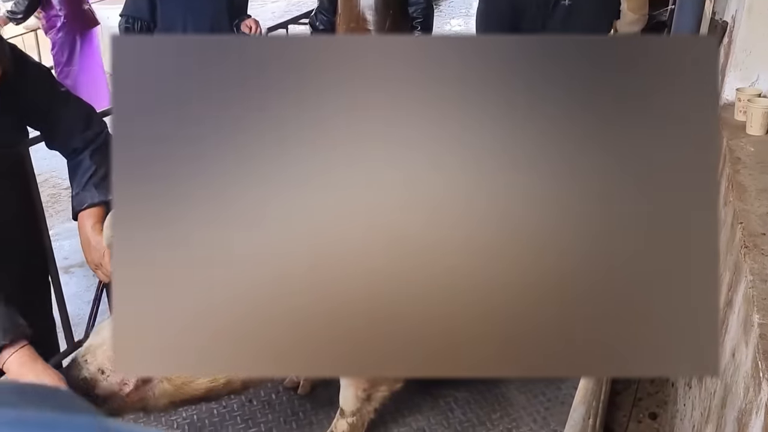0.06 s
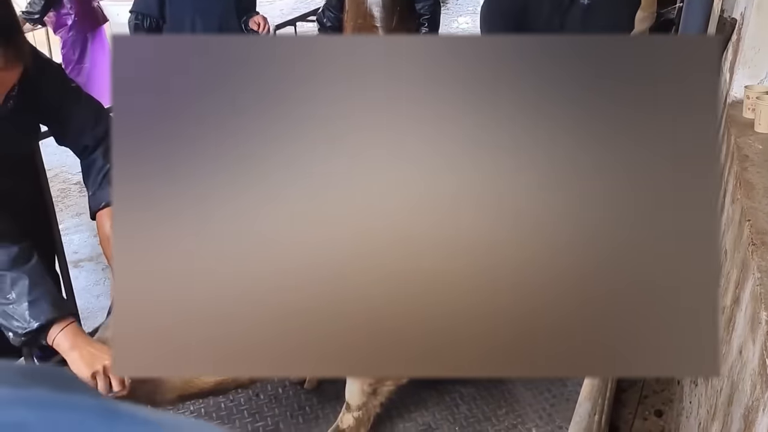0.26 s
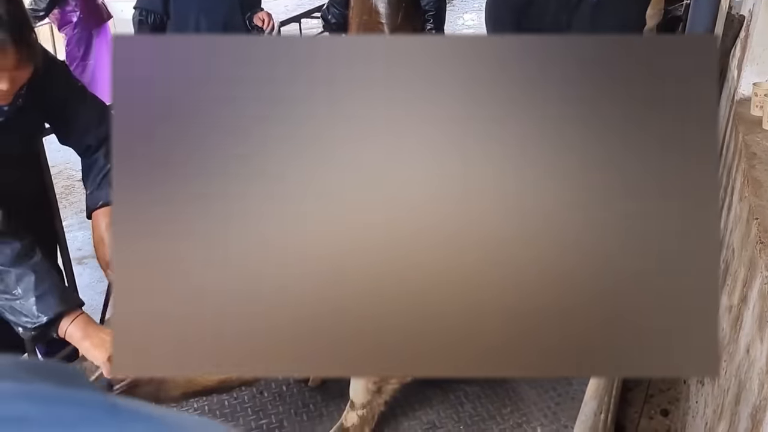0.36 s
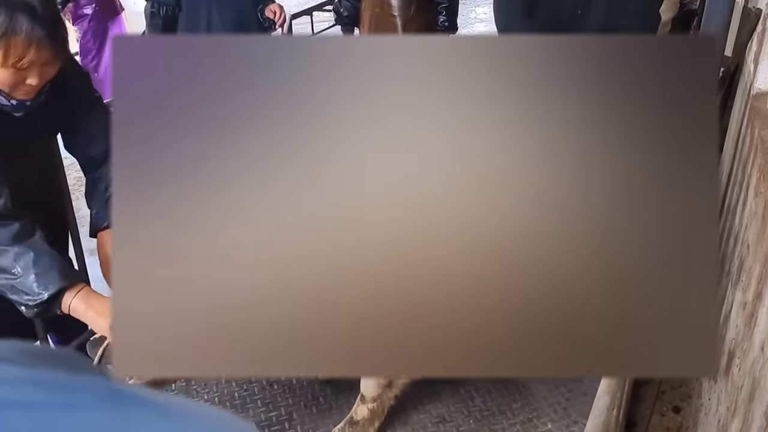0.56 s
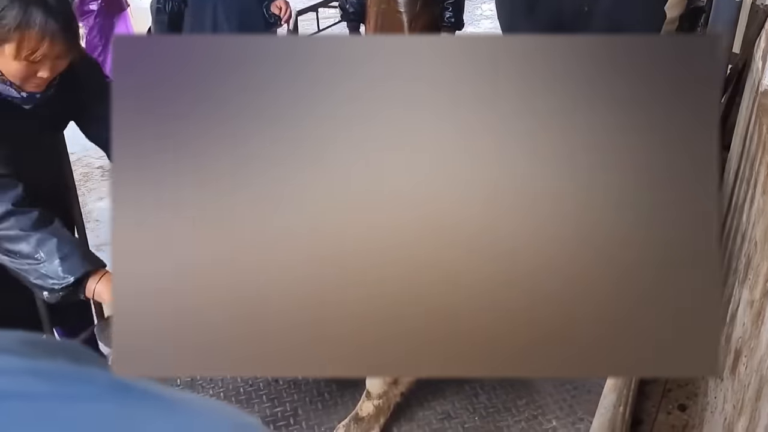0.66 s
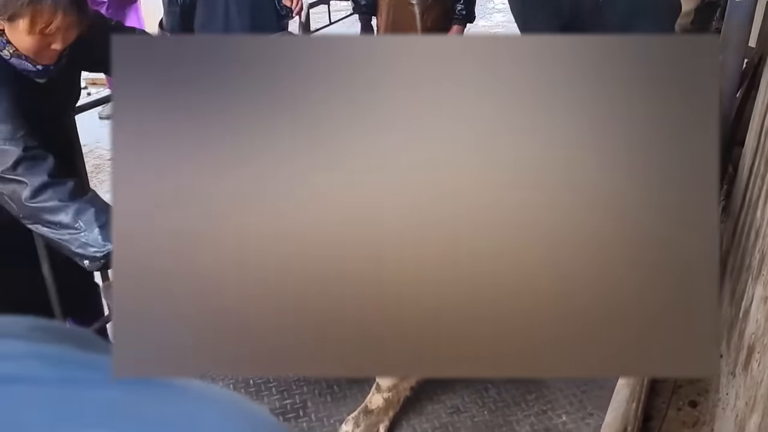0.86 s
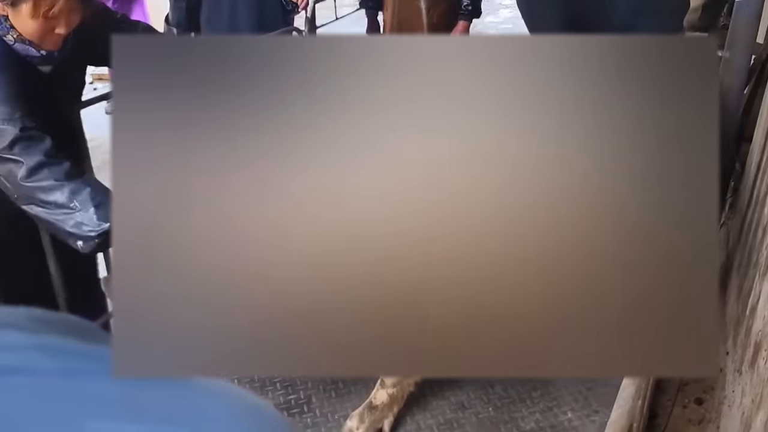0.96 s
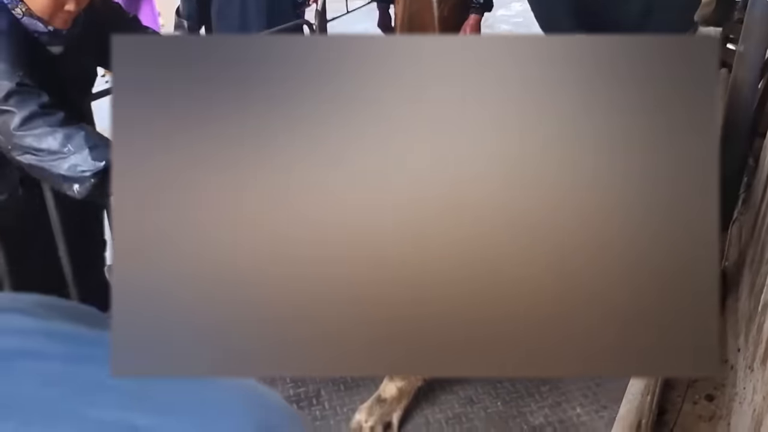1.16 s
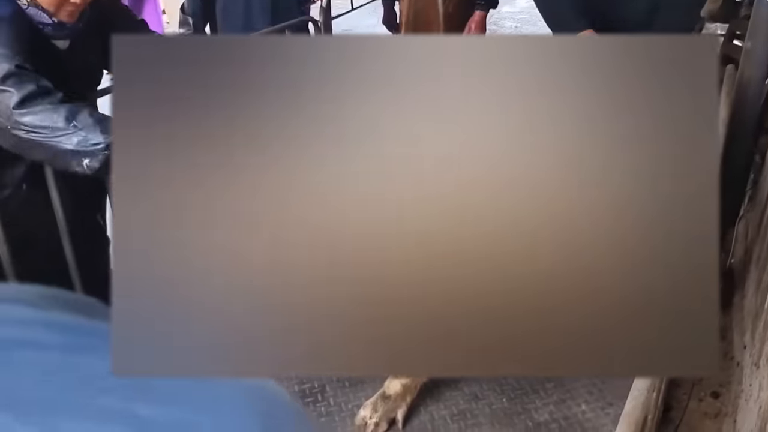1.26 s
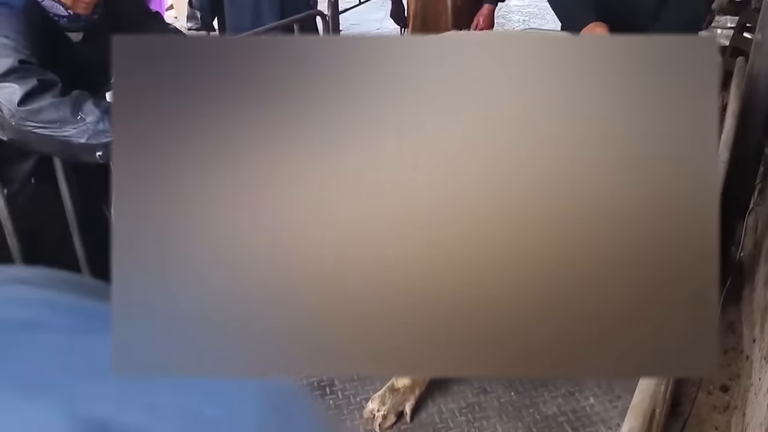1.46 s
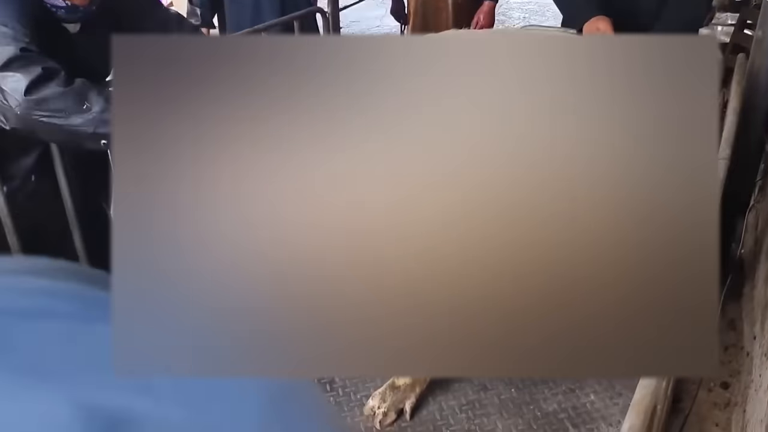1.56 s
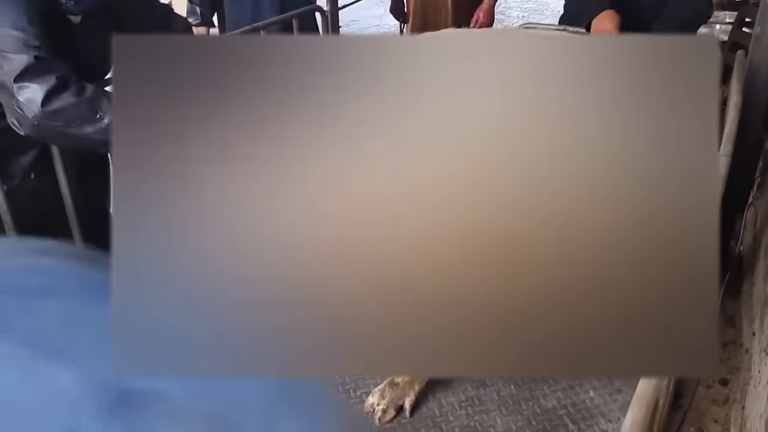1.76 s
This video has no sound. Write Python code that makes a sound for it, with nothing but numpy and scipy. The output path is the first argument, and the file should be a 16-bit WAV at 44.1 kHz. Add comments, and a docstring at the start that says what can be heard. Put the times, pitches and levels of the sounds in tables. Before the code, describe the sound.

Close pig cries in a shed: a guttural fluttering growl opens up and ends in a short yelp, small grunts follow, then a loud hoarse squeal and a shorter, weaker one, over faint steady yard noise.

```python
"""Farm shed, stereo microphone near a big pig held down: a long rattling growl tips into a yelp, then two squeals.
Its throat flaps some 30 times a second. Each flap thumps the chest and drives a burst of air
through the resonances of throat and snout; the squeals add a falling tone within each flap.
Between and after the cries come short grunts, a faint narrow hum, then soft thumps and a scuff, each a
swell of noise. The shed gives a dull diffuse tail, and steady noise of the farmyard lies beneath."""
import sys
import numpy as np
from scipy import signal
from scipy.fft import rfft, irfft
from scipy.io import wavfile
from scipy.ndimage import uniform_filter1d

SR = 44100
rng = np.random.default_rng(int(sys.argv[2]) if len(sys.argv) > 2 else 0)


def wav_out(sig):
    """Save sig, one row per channel (or a flat mono array), as 16-bit PCM at SR to the path in sys.argv[1]."""
    wavfile.write(sys.argv[1], SR, np.round(np.clip(np.atleast_2d(sig).T, -1, 1) * 32767).astype(np.int16))


N = 79380
SIZE = 2 ** 17   # transform length, samples
HZ = np.maximum(np.arange(SIZE // 2 + 1) * SR / SIZE, 1)
T = np.arange(N) / SR


def from_db(db):
    """Decibels to gain."""
    return 10 ** (np.asarray(db) / 20)


def unit(x):
    """Scale to a mean energy of one per channel, summed over time."""
    return x / np.sqrt(np.mean(np.sum(x ** 2, axis=-1)) + 1e-20)


def through(x, response):
    """Pass x through an impulse response."""
    return irfft(rfft(x, SIZE) * rfft(response, SIZE))[..., :N]


def band(x, low_hz, high_hz, order=2):
    """Butterworth band-pass."""
    return signal.sosfilt(signal.butter(order, [low_hz, high_hz], "band", fs=SR, output="sos"), x)


def add(out, s, sound):
    """Mix a sound in at a time in seconds."""
    start = max(int(s * SR), 0)
    out[:, start:start + sound.shape[1]] += sound


def burst(rise_s, decay_s, steepness=1.37, size=4096):
    """Envelope of one puff of air; a steep one holds and then stops short."""
    t = T[:size]
    return unit((1 - np.exp(-t / rise_s)) * np.exp(-(t / decay_s) ** steepness))


def rattle(shape):
    """A short, dense, colourless crackle, the part of a flap that repeats."""
    x = shape * rng.standard_normal(len(shape))
    for _ in range(12):
        # flatten the spectrum, then bring the envelope back
        spectrum = rfft(x)
        x = irfft(spectrum / (abs(spectrum) + 1e-12))
        local_power = abs(uniform_filter1d(x * x, size=200))
        x = x * shape / np.sqrt(local_power + 1e-12)
    return unit(x)


def tract(voice, low, high, shift=0, size=4096):
    """Stereo impulse response of the steep resonances between two frequencies, all shifted by some percent."""
    out = np.zeros((2, size))
    # the faint cosine keeps the filters off vanishingly small numbers
    click = signal.unit_impulse(size) + 1e-18 * np.cos(np.arange(size))
    for hz, width, db, pan_db in voice:
        if low <= hz < high:
            r = np.exp(-np.pi * width / SR)
            w = 2 * np.pi * hz * (1 + shift / 100) / SR
            b = np.array([1, 0, -1]) * (1 - r * r) / 2
            a = [1, -2 * r * np.cos(w), r * r]
            ring = signal.lfilter(b, a, signal.lfilter(b, a, click))
            ear_gains = from_db([[db + pan_db / 2], [db - pan_db / 2]])
            out = -out + ear_gains * ring   # signs alternate down the list
    return unit(out)


WANDER_PERCENT = 1.0   # standard deviation of the detuning, drawn per flap and band


def mouth_at(mouth, s, low, high):
    """Response of the mouth at one flap: a blend of the shapes before and after, slightly detuned."""
    times, voices = zip(*mouth)
    shares = [np.interp(s, times, row) for row in np.eye(len(times))]
    shift = WANDER_PERCENT * rng.standard_normal()
    return sum(share * tract(voice, low, high, shift) for share, voice in zip(shares, voices) if share > 0)


def shrill(whistle, s, shape):
    """The tone within one flap, its pitch sagging steadily as the flap goes on."""
    times, *columns = np.transpose(whistle)
    hz, sag, db = [np.interp(s, times, c) for c in columns]
    t = T[:len(shape)]
    cycles = hz * t - sag * t * t / 2 + rng.random()
    return from_db(db) * unit(shape * np.sin(2 * np.pi * cycles))


def flaps(rate, levels):
    """One row per flap: its time from the flap rate, its strengths from the level curves."""
    s, per_s = np.transpose(rate)
    t = T[(T >= s[0]) & (T < s[-1])]
    turns = np.floor(np.cumsum(np.interp(t, s, per_s)) / SR)
    times = t[np.diff(turns, prepend=-1) > 0]
    s, *columns = np.transpose(levels)
    return np.transpose([times] + [np.interp(times, s, c) for c in columns])


# edges of the throat, snout and rasp bands: f/Hz; the chest lies below the first
BAND_EDGES_HZ = 330, 1460, 2950, 20000
# sound that differs between the ears, against the shared sound: level/dB for throat, snout, rasp
SCATTER_DB = [-11.5, -2.5, -2]
AIR_ATTACK_S, RISE_S, SNOUT_AIR_S = 0.0042, 0.0021, .021
BUILD_UP_S, CHEST_LAG_S, HISS_LAG_S = 0.004, 0.0075, 0.0031
CHEST_ROUGH = 0.74   # amount of noise beside the click in the chest thump
FLAP_S = 1 / 32   # flap spacing at which the level columns are meant


def cry(rows, mouth, rattle_s, steepness, air_s, rough, rasp_rough, lead_s, whistle=(), size=4096):
    """Each flap drives chest thump, rattle, fresh noise and any tone through resonances; left ear leads."""
    out = np.zeros((2, N + 4 * size))
    shape = burst(RISE_S, rattle_s, steepness)
    air = burst(AIR_ATTACK_S, air_s, steepness)
    puffs = air, burst(AIR_ATTACK_S, SNOUT_AIR_S), burst(AIR_ATTACK_S, decay_s=0.033)
    noise_shares = rough, rasp_rough, rasp_rough   # of the energy, in throat, snout, rasp
    rattles = [np.array([rattle(shape), rattle(shape)]) for _ in noise_shares]
    for s, chest_db, *levels in rows:
        start = max(s - BUILD_UP_S, 0)
        push = signal.unit_impulse(size) + CHEST_ROUGH * air * rng.standard_normal(size)
        chest = mouth_at(mouth, s, 0, BAND_EDGES_HZ[0])
        thump = unit(signal.fftconvolve([push], chest, axes=1))
        add(out, start + CHEST_LAG_S, from_db(chest_db) * thump)
        for k in range(3):   # throat, snout, rasp
            fresh = puffs[k] * rng.standard_normal((2, size))
            share = noise_shares[k]
            mid, side = np.sqrt(1 - share) * rattles[k] + np.sqrt(share) * fresh
            if k == 0 and len(whistle):
                mid = mid + shrill(whistle, s, shape)
            drive = mid + from_db(SCATTER_DB[k]) * side * [[1], [-1]]
            resonances = mouth_at(mouth, s, BAND_EDGES_HZ[k], BAND_EDGES_HZ[k + 1])
            voiced = unit(signal.fftconvolve(drive, resonances, axes=1))
            add(out, start + k * HISS_LAG_S, from_db(levels[k]) * voiced)
    left, right = out[:, :N] * np.sqrt(SR * FLAP_S)
    samples = np.arange(N)
    return np.array([left, np.interp(samples - np.round(lead_s * SR), samples, right)])


# flap rate of the growl: t/s, flaps per s
GROWL_RATE = [(0.0, 35.6), (0.18, 34.2), (0.23, 37.4), (0.345, 38.8), (0.375, 27.7), (0.41, 32.0),
              (0.565, 32.2), (0.605, 39.5), (0.695, 38.4), (0.725, 25.2), (0.77, 30.5), (0.895, 29.5)]
# strength of its flaps: t/s, then level/dB of chest, throat, snout, rasp
GROWL_LEVELS = [(0, -32, -30.5, -39.5, -40), (0.085, -32.5, -30, -31.5, -42), (0.2, -29.5, -30.5, -31, -41),
                (0.28, -27, -24.5, -37.5, -42), (0.332, -28.5, -25, -26.5, -36.5),
                (0.36, -26.5, -25.5, -43, -42), (0.394, -21.5, -19, -33.5, -33.5),
                (0.456, -25, -19.5, -38, -31.5), (0.488, -20.5, -15.5, -22.5, -29),
                (0.55, -24.5, -14.5, -22, -32), (0.607, -23.5, -20, -39.5, -37),
                (0.683, -26, -22.5, -32.5, -33), (0.747, -26.5, -27.5, -30, -39),
                (0.814, -25.5, -23.5, -35, -32.5), (0.848, -21.5, -21.5, -37.5, -30.5),
                (0.882, -36, -47, -41, -36)]
# resonances, relative within a band: f/Hz, width/Hz of each of two passes, level/dB, left-right/dB
GROWL_CHEST = [(66, 53.4, 5.5, 0.5), (135, 43.6, -1, 0.5), (195.8, 42, 4, 0)]
# chest, throat and snout with the mouth open: same columns
GROWL_VOICE = GROWL_CHEST + [(400, 36, -9, -13), (471, 48, -1.5, 10.5), (520.4, 53, 0.0, -5),
               (701, 52.4, 0, 4.5), (779, 70, 4.5, -2), (880, 90, -4, 2.5), (989, 51, 1.0, 2.5),
               (1098, 107, 1, 2), (1268, 47, -8.5, 3), (1395, 61, -20, -3), (1857, 96, -12.5, 5.5),
               (2091, 76, 1.5, 2.5), (2435, 69, -3, -2.5), (2713, 100, -14.5, 6.5), (2980, 68, -9, -11.5),
               (3288, 164, -1.0, 1.5), (3628, 180, -4.0, 2.5), (4810, 2200, -26, 0.5),
               (6640, 1550, -26, -0.5), (12000, 3800, -39, -2)]
# the mouth still closed: same columns
CLOSED_VOICE = [(151, 124, 3, 1), (433, 177, -1.5, 0), (709.6, 32.5, 5, -0.5), (801, 29, -2, -1),
                (903, 98, -1.5, 2), (1147, 77, -4.5, 0.5), (1405, 124, -7.5, 0.5), (2157, 165, -6.5, 2.5),
                (2548, 153, -3, -4.5), (3460, 950, -14, 1.5), (5700, 3200, -29, -1), (12500, 3700, -41, -7)]
# the mouth opens smoothly: t/s, resonances
GROWL_MOUTH = [(0.069, CLOSED_VOICE), (.29, GROWL_VOICE)]


def growl():
    """Long rattle of the throat flaps while the mouth opens."""
    return cry(flaps(GROWL_RATE, GROWL_LEVELS), GROWL_MOUTH, rattle_s=.019, steepness=1.8, air_s=0.025,
               rough=.33, rasp_rough=0.79, lead_s=0.00013)


ROOM_T60_S, ROOM_DB = 0.34, -9.5   # decay time; tail level ahead of its band filter
ROOM_LOW_HZ, ROOM_HIGH_HZ = 346, 2770


def shed(x):
    """Dull diffuse tail: decaying noise, partly shared by both ears, with a short build-up."""
    noise = rng.standard_normal((2, N)) + 0.71 * rng.standard_normal(N)
    tail = unit(noise * from_db(-60 * T / ROOM_T60_S) * np.clip(T / 0.0059, 0, 1))
    return from_db(ROOM_DB) * through(x.mean(axis=0), band(tail, ROOM_LOW_HZ, ROOM_HIGH_HZ, order=1))


# spectrum of the yard, relative: f/Hz, level/dB per Hz
FLOOR = [(30, -1.5), (110, -4.5), (250, -9.5), (600, -10.5), (1000, -3), (2000, -21.5), (4000, -21.5),
         (8000, -35.5), (15000, -40.5)]
FLOOR_DB = -44.5   # overall level


def yard():
    """Steady background of the farmyard: coloured noise, mostly shared by both ears."""
    hz, db = np.transpose(FLOOR)
    noise = .5 * rng.standard_normal((2, SIZE)) + rng.standard_normal(SIZE)
    colour = from_db(np.interp(np.log(HZ), np.log(hz), db))
    return from_db(FLOOR_DB) * np.sqrt(N) * unit(irfft(rfft(noise) * colour)[:, :N])


# flap rate of the yelp: t/s, flaps per s
YELP_RATE = [(.833, 30), (.87, 30), (.9, 42), (.96, 36)]
# strength of its flaps: t/s, then level/dB of chest, throat, snout, rasp
YELP_LEVELS = [(.832, -58, -18, -37.5, -33.5), (0.868, -35.5, -16.5, -43.5, -40),
               (0.896, -53, -34.5, -39, -41), (.925, -53, -37, -47, -61), (0.951, -51.5, -40, -52.5, -60)]
# its resonances: f/Hz, width/Hz of each pass, level/dB, left-right/dB
YELP_VOICE = GROWL_CHEST + [(803.0, 65, 3, 0.006), (387, 26, -21.0, 0.007), (642, 56, -10.5, 0.0011),
              (1793, 270, -24, 0.01), (2190, 140, -20.5, 0.0019), (3450, 550, -20, 0.001)]


def yelp():
    """Short flaps, nearly all repeating rattle in the throat, that close the growl."""
    return cry(flaps(YELP_RATE, YELP_LEVELS), [(0, YELP_VOICE)], rattle_s=0.0043, steepness=1.4, air_s=0.036,
               rough=.03, rasp_rough=0.33, lead_s=.00012)


# faint narrow hum near 370 Hz, low part of a grunt near 230 Hz, then thumps and a scuff:
# t/s, level/dB, low f/Hz, high f/Hz, attack/s, decay/s
SWELLS = [(0.974, -38, 356, 390, .02, 0.031), (1.033, -31, 215, 251, 0.02, 0.027),
          (1.368, -31.5, 46, 193, 0.0034, 0.0053), (1.682, -38, 1120, 1810, 0.029, 0.012),
          (1.774, -30, 103, 213, 0.01, 0.033)]


def hum_thumps_and_scuff():
    """A faint hum, the low part of a grunt, soft thumps and a scuff: swells of noise in one band each."""
    out = np.zeros(N)
    for s, db, low_hz, high_hz, attack_s, decay_s in SWELLS:
        attack = np.clip((T - s) / attack_s, 0, 1)
        decay = np.exp(-np.maximum(T - s - attack_s, 0) / decay_s)
        noise = unit(band(rng.standard_normal(N), low_hz, high_hz)) * np.sqrt(N)
        out += from_db(db) * attack * decay * noise
    return out


# single grunts: t/s, then level/dB of chest, throat, snout, rasp
GRUNTS = [(1.021, -36.5, -31.5, -38.5, -41), (1.046, -45.5, -37.5, -42, -51.5),
          (1.366, -37.5, -45.5, -40, -43), (1.389, -37.5, -27.5, -38, -49.5)]
# chest resonances, grunts and squeals: f/Hz, width/Hz of each pass, level/dB, left-right/dB
SQUEAL_CHEST = [(90, 104, 1.5, 0), (161, 52, -7, 0), (221.6, 52, 5, 0)]
# chest, throat and snout of the grunts and first squeal: same columns
SQUEAL_VOICE = SQUEAL_CHEST + [(450, 430, -18, 1), (790, 55, 0.5, -4.0), (884.5, 47.5, 3.5, 4),
                (993, 68, 2.5, 0), (1111, 64, -1.5, 8.5), (1305, 102, -10, 2.5), (1480, 90, -9, -4),
                (1757, 272, -19, 1), (2061, 140, -4.5, 1.0), (2262, 180, -12.5, -5),
                (2650, 170, -25.5, -0.5), (3053, 410, -15, 2.5), (3470, 170, -21, -3),
                (3730, 280, -20.0, 0.0), (4600, 4700, -41, -2.5), (6720, 1500, -32.5, -1.5),
                (11800, 2500, -49.5, -2.5)]
# the mouth holds one shape: t/s, resonances
SQUEAL_MOUTH = [(0, SQUEAL_VOICE)]


def grunts():
    """Single flaps of the throat, through the mouth shape of the first squeal."""
    return cry(GRUNTS, SQUEAL_MOUTH, rattle_s=0.026, steepness=0.85, air_s=0.014,
               rough=0.57, rasp_rough=1.0, lead_s=0.00016)


# flap rate of the first squeal: t/s, flaps per s
SQUEAL_RATE = [(1.087, 31), (1.17, 31.5), (1.2, 42), (1.27, 43)]
# strength of its flaps: t/s, then level/dB of chest, throat, snout, rasp
SQUEAL_LEVELS = [(1.087, -27.5, -13, -26.5, -35), (1.12, -22, -8.5, -33, -27.5),
                 (1.154, -29, -12, -19, -32), (1.189, -26, -11, -24, -38.5),
                 (1.232, -34, -16, -25.5, -35.5), (1.255, -33.5, -19, -45, -47.5)]
# its tone: t/s, f/Hz at the flap's start, sag in Hz per s, level/dB against the throat's drive
SQUEAL_WHISTLE = [(1.09, 1025, 9700, -16), (1.122, 1057, 12500, -19.5), (1.155, 1038, 10950, -28),
                  (1.19, 1020, 5380, -16.5), (1.25, 1004, 2960, -14.5)]


def first_squeal():
    """Hoarse squeal: steep flaps with a sagging tone in the throat, all fresh noise above it."""
    return cry(flaps(SQUEAL_RATE, SQUEAL_LEVELS), SQUEAL_MOUTH, rattle_s=0.026, steepness=3.3, air_s=0.021,
               rough=.22, rasp_rough=1.0, lead_s=.00005, whistle=SQUEAL_WHISTLE)


# flap rate of the last squeal: t/s, flaps per s
LAST_RATE = [(1.451, 29.7), (1.635, 30)]
# strength of its flaps: t/s, then level/dB of chest, throat, snout, rasp
LAST_LEVELS = [(1.451, -31.5, -22.5, -26.5, -39), (1.486, -28.5, -20.5, -30, -35.5),
               (1.518, -32.5, -14, -26.5, -24.5), (1.554, -31, -13, -29, -27),
               (1.586, -40.5, -31.5, -33.5, -32), (1.619, -54, -29, -36, -44.5)]
# its resonances: f/Hz, width/Hz of each pass, level/dB, left-right/dB
LAST_VOICE = SQUEAL_CHEST + [(440, 134, -15.5, 1.5), (552, 87, -14, -4), (625.5, 50, -3.5, -3),
              (822, 96, -5, 3.0), (905, 40.4, -5, -4.5), (1020, 90, -3.5, -3), (1120, 70, -19.5, -1),
              (1297, 60, -16.5, 1), (1840, 350, -13.5, 5.0), (2206, 230, -12.5, -4), (2520, 340, -18, 6),
              (3185, 92, -20, -1.5), (3540, 260, -17, 2.5), (4040, 750, -25.5, -2.0), (6510, 830, -36.5, 0),
              (11550, 970, -53, -4)]
# the mouth passes from the first squeal's shape to this one: t/s, resonances
LAST_MOUTH = [(1.487, SQUEAL_VOICE), (1.522, LAST_VOICE)]
# its tone: t/s, f/Hz at the flap's start, sag in Hz per s, level/dB against the throat's drive
LAST_WHISTLE = [(1.452, 994, 2000, -14), (1.487, 1077, 1500, -27.5), (1.52, 942, 6640, -20),
                (1.555, 926, 6400, -15), (1.6, 880, 3000, -20)]


def last_squeal():
    """Second hoarse squeal: a sagging tone in each flap while the mouth changes shape."""
    return cry(flaps(LAST_RATE, LAST_LEVELS), LAST_MOUTH, rattle_s=0.016, steepness=2.4, air_s=0.047,
               rough=.22, rasp_rough=0.93, lead_s=.00014, whistle=LAST_WHISTLE)


def scene():
    """Pig, hum, thumps and scuff near the microphone, the shed around them, over the yard."""
    pig = growl() + yelp() + grunts() + first_squeal() + last_squeal()
    near = pig + hum_thumps_and_scuff()
    return near + shed(near) + yard()


CUTOFF_HZ = 15100


def record(dry):
    """At the microphone: the highest peaks are rounded, the top is cut."""
    rounded = dry / (1 + dry ** 6) ** (1 / 6)
    # the stop band, 70 dB down, begins 600 Hz above the cutoff
    top_cut = signal.cheby2(16, 70, CUTOFF_HZ + 600, fs=SR, output="sos")
    return signal.sosfilt(top_cut, rounded)


dry = scene()
out = record(dry)
wav_out(out)
```